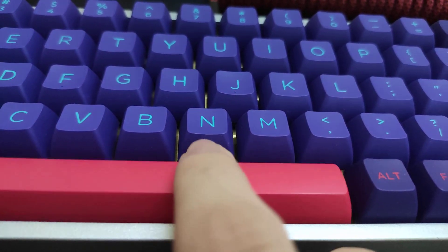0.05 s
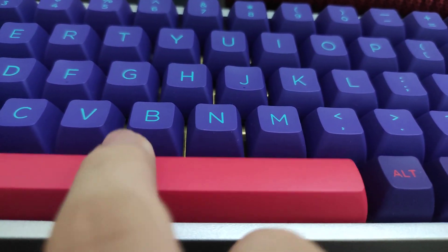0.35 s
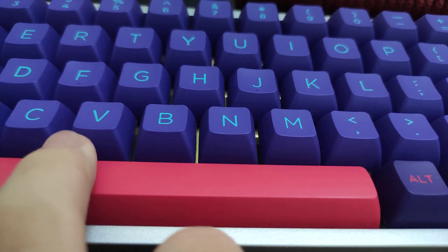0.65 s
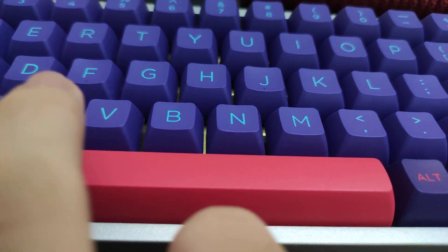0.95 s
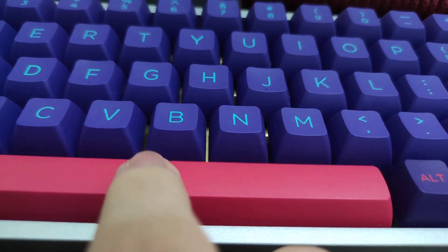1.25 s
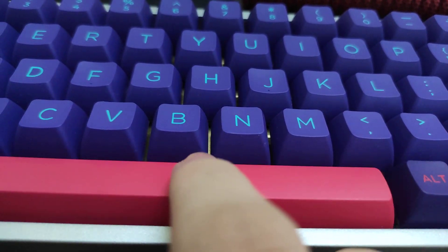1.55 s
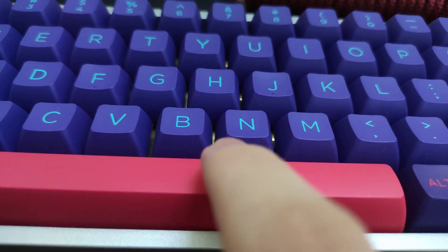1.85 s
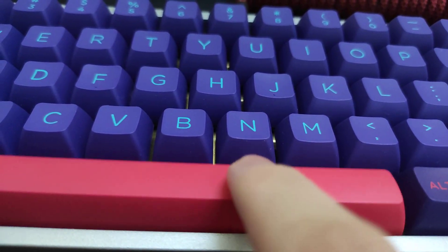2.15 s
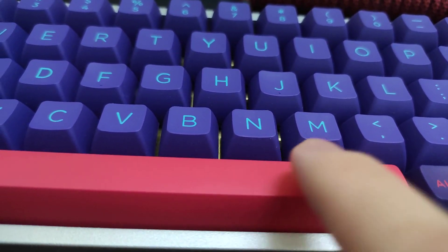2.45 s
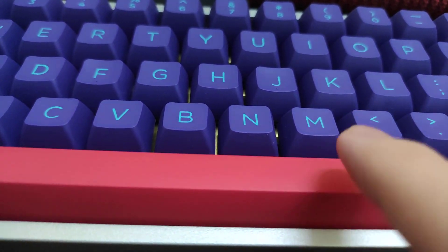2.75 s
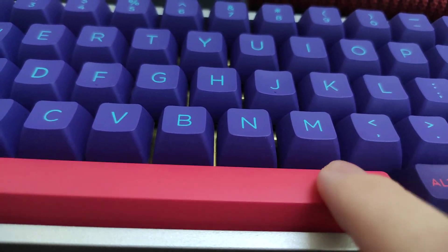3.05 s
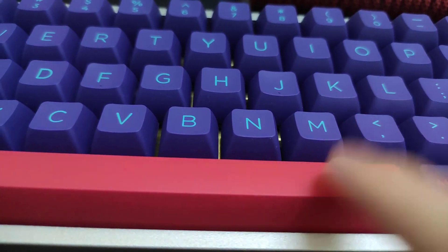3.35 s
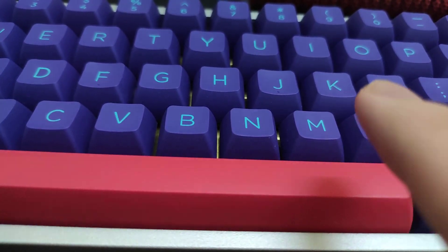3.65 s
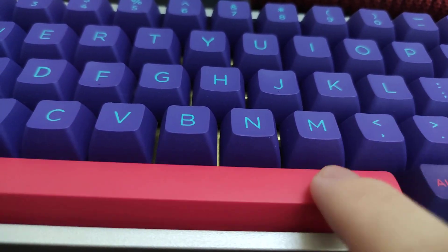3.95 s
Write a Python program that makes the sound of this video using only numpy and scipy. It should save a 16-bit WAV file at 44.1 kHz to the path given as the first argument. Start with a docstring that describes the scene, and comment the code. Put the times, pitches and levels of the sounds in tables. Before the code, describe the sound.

Sharp plastic clacks come from a mechanical keyboard spacebar as a finger presses and releases it, pausing briefly, then tapping on quickly, hardest near the end. The microphone is close, with a short room echo and faint hush.

```python
"""Tapping a keyboard spacebar

A finger works the plastic spacebar of a mechanical keyboard, close to a stereo microphone.
Each press hits the bottom with a clack, and each release snaps back against the top of the switch.
The bar rings briefly, the springs ping and the case thumps the desk.
A small room echoes each hit over a quiet hush."""
import sys
import numpy as np
from scipy import signal
from scipy.fft import rfft, irfft
from scipy.io import wavfile

SR = 44100
rng = np.random.default_rng(int(sys.argv[2]) if len(sys.argv) > 2 else 0)


def log_audio(samples):
    """Write samples as a 16-bit WAV file to the path given in sys.argv[1]."""
    # one column per channel
    frames = np.atleast_2d(samples).T
    # limit to full scale, then quantise
    limited = np.clip(frames, -1, 1)
    pcm = np.round(limited * 32767).astype(np.int16)
    wavfile.write(sys.argv[1], SR, pcm)


N = 176400
HIT_TIME = np.arange(round(.07 * SR)) / SR  # seconds since a hit
TAIL_TIME = np.arange(SR // 2) / SR  # the same, for longer sounds


def amp(db):
    """Turns decibels into a number to multiply a sound by."""
    return 10 ** (np.asarray(db) / 20)


def fade(t, fade_s):
    """Dies away by 60 dB every fade_s seconds."""
    return amp(-60 * t / fade_s)


def unit(x):
    """Gives a hit the energy of ten milliseconds at full level."""
    return x / np.sqrt(np.mean(np.sum(x ** 2, -1)) / (SR / 100) + 1e-20)


def read(points, hz):
    """Looks up a value between the pitches of a table."""
    pitches, values = np.transpose(points)
    return np.interp(np.log(hz + 1), np.log(pitches + 1), values)


def add(mix, start_s, sound):
    """Mixes a sound in at start_s."""
    part = mix[:, max(round(start_s * SR), 0):][:, :sound.shape[1]]
    part += sound[:, :part.shape[1]]


def colour(x, tone, size=4096):
    """Turns each pitch up or down as a table says, without making the sound start early."""
    log_gain = np.log(amp(read(tone, abs(np.fft.fftfreq(size, 1 / SR)))))
    taps = np.fft.ifft(np.exp(np.conj(signal.hilbert(log_gain)))).real[:size // 2]
    return signal.fftconvolve(x, taps[None], axes=1)[:, :x.shape[1]]


# The tone of the background noise. Columns: pitch_hz, level_db
HUSH_TONE = [(15, -40), (25, -8), (44, -9), (97, -12), (677, -29), (1040, -35.5), (3160, -34.5),
             (4370, -40), (13600, -54.5), (16000, -75)]
def hush(level_db=-60.5, alike_below_hz=445):
    """Quiet room noise, nearly the same left and right in the bass."""
    hz = np.fft.rfftfreq(N, 1 / SR)
    left, other = rfft(rng.standard_normal((2, N)))
    alike = .9 / (1 + (hz / alike_below_hz) ** 2)
    right = alike * left + np.sqrt(1 - alike ** 2) * other
    noise = irfft(np.array([left, right]) * amp(read(HUSH_TONE, hz)), N)
    return amp(level_db) * noise / noise.std()


def wall_echo(t, arrives_s=.029, width_s=.005):
    """A fading sound swells briefly when it bounces back from the wall."""
    return 1 + .7 * np.exp(-.5 * ((t - arrives_s) / width_s) ** 2)


# The tone of the room's echoes. Columns: pitch_hz, level_db
ECHO_TONE = [(60, -11.5), (280, 0), (520, 3.5), (800, -8.5), (1500, -12.5), (3000, -11), (4200, -10.5),
             (9000, -10.5), (15000, -20)]
# How long the echoes last. Columns: pitch_hz, fade_s
ECHO_FADES = [(100, 0.65), (500, 0.3), (2000, 0.42), (5500, 0.35), (9000, 0.34), (15000, 0.73)]
def room(x, gain_db=-2, rise_s=.011):
    """Echoes blur into a tail that builds quickly, then fades at its own speed for each pitch."""
    out, clock = 0, np.arange(N) / SR
    for k in range(3):
        hz, frame_s, noise = signal.stft(rng.standard_normal((2, SR)), SR, nperseg=256)
        tail = signal.istft(noise * fade(frame_s, read(ECHO_FADES, hz)[:, None]), SR, nperseg=256)[1]
        t = np.arange(tail.shape[1]) / SR
        tail *= (1 - np.exp(-(t / rise_s) ** 2)) * np.sqrt(wall_echo(t))
        tail = colour(tail / np.linalg.norm(tail[0]), ECHO_TONE)
        # Three tails take turns, so each hit meets different echoes.
        share = np.sqrt(2 / 3) * np.cos(2 * np.pi * (1.7 * clock + k / 3))
        out = out + signal.fftconvolve(x * share, tail, axes=1)[:, :N]
    return amp(gain_db) * out


# How the two sides hear the keyboard. Columns: pitch_hz, left_minus_right_db, left_lead_radians
MIC_SIDES = [(80, 2, 0), (190, -5, 0), (450, -4, -.1), (760, -1, -.4), (1120, -2, -1.2), (1600, -1.5, -1.9),
             (2050, -4, -6.3), (2700, -1, -7.8), (3900, 1, -12.3), (5500, 4, -14), (8000, 3, -17),
             (14000, -2, -19)]
def microphone(x):
    """Each pitch reaches the left and right sides with a different level and timing."""
    hz, table = np.fft.rfftfreq(N, 1 / SR), np.array(MIC_SIDES)
    side_db = read(table[:, :2], hz)
    lead = np.interp(hz, table[:, 0], table[:, 2])
    gains = amp([side_db / 2, -side_db / 2])
    gains /= np.sqrt(np.mean(gains ** 2, 0))
    return irfft(rfft(x) * gains * np.exp(1j * np.array([lead, 0 * lead])), N)


# The low notes of the desk and room. Columns: pitch_hz, level_db, fade_s
BOOM_NOTES = [(78.9, -8.5, 0.2), (130.9, -17.5, 0.47), (193.5, -27, 0.68), (243.5, -13, 0.3),
              (291.6, -11, .38), (335, -10.5, 0.29), (430.5, -21.5, 0.4)]
def desk_boom(gain_db=7, delay_s=.00554, rise_s=.009):
    """Low notes of the desk and room swell after a thump and throb against each other."""
    out, t = 0, TAIL_TIME
    for hz, db, fade_s in BOOM_NOTES:
        phase = 2 * np.pi * hz * (t - delay_s) + .2 * rng.standard_normal((2, 1))
        out = out + amp(db) * fade(t, fade_s) * np.cos(phase)
    return amp(gain_db) * out * (1 - np.exp(-(t / rise_s) ** 2)) * wall_echo(t)


def case_thump(swing_hz=170, delay_s=.003973, width_s=.00077):
    """The case pushes the desk once and springs back."""
    t = HIT_TIME - delay_s
    return unit(np.sin(2 * np.pi * swing_hz * t) * np.exp(-.5 * (t / width_s) ** 2))


def spring_pings(centre_hz=2950, gain_db=-36):
    """The springs give twelve faint pings, close together in pitch."""
    hz = centre_hz * (1 + .09 * rng.uniform(-1, 1, size=(12, 1, 1)))
    pings = np.sin(2 * np.pi * (hz * TAIL_TIME + rng.random(size=(12, 2, 1))))
    return amp(gain_db) * fade(TAIL_TIME, fade_s=.38) * pings.mean(0)


# The tone of hard plastic being hit. Columns: pitch_hz, level_db
CRACK_TONE = [(100, -1), (1200, -8), (2100, 2.5), (3300, 0), (4500, -2.5), (5600, 0.5), (6700, -6),
              (7600, -10.5), (9500, -23), (14000, -34), (16000, -61.5)]
def crack(treble_db=0):
    """A hard contact: a snap, then so many high notes at once that they sound like noise."""
    shape = fade(HIT_TIME, fade_s=.021) + amp(-2) * fade(HIT_TIME, fade_s=.0012)
    noise = rng.choice([-1, 1], (3, len(HIT_TIME)))  # shared, left, right
    burst = colour(shape * (noise[0] + noise[1:]), CRACK_TONE)
    return unit(colour(burst, [(5200, 0), (7400, treble_db)]))


def ring(notes, pitch_ratio=1, attack_s=.0002):
    """The bar's own notes ring and fade, a little differently wherever the finger lands."""
    out = 0
    for hz, db, fade_s in notes:
        detune, louder, shift = rng.standard_normal(3)
        phase = 2 * np.pi * hz * pitch_ratio * (1 + .018 * detune) * HIT_TIME + .6 * shift
        note = amp(db + 1.8 * louder) * fade(HIT_TIME, fade_s) * np.sin(phase)
        out = note - out  # neighbouring notes swing opposite ways
    return unit(out * (1 - np.exp(-HIT_TIME / attack_s)))[None]


# The main notes of the bar when it is down. Columns: pitch_hz, level_db, fade_s
DOWN_NOTES = [(751, -21.5, 0.048), (915, -23, 0.042), (1358, -9, 0.039), (1623, 0.5, 0.022),
              (1915, 0.5, 0.017), (2114, -10.5, .02), (2797, -17, 0.033), (5355, -14, 0.011),
              (6400, -15, 0.015)]
def down_ring(pitch_hz=None):
    """The pressed bar rings. Giving pitch_hz moves all its notes so the strongest sits there."""
    strongest_hz = max(DOWN_NOTES, key=lambda note: note[1])[0]
    return ring(DOWN_NOTES, pitch_hz / strongest_hz if pitch_hz else 1)


# Ticks of the wire under the bar. Columns: start_s, level_db
WIRE_TICKS = [(2.544, -63), (3.107, -50), (3.263, -62.5)]
def wire_ticks(hits):
    """The wire that keeps the bar level gives tiny, bright ticks."""
    for start_s, level_db in WIRE_TICKS:
        add(hits, start_s, amp(level_db) * crack(treble_db=17))


# Light landings of the finger. Columns: start_s, level_db, pitch_hz
FINGER_TOUCHES = [(.088, -48, 1600), (0.157, -54, 1700), (.304, -54.5, 1600), (.436, -58.5, 970),
                  (.699, -51, 970), (.843, -44.5, 1070), (2.729, -41, 1470), (3.449, -40.5, 1420),
                  (3.793, -43.5, 1500)]
def finger_touches(hits):
    """The finger lands on the loose bar and takes up its slack with a soft click."""
    for start_s, level_db, pitch_hz in FINGER_TOUCHES:
        add(hits, start_s, amp(level_db) * (down_ring(pitch_hz) + .37 * crack()))


def lead_in_rustle(swell_s):
    """A faint, ringing rustle swells just before each press's clack."""
    count = round(swell_s * SR)
    rising_noise = rng.standard_normal(count) * np.linspace(.3, 1, count)
    return unit(signal.fftconvolve(down_ring() + .5 * crack(), rising_noise[None], axes=1))


# Second hits just after a press. Columns: start_s, ring_db, crack_db
LATE_LANDINGS = [(2.7448, -49, -38), (3.4636, -25.5, -33.5)]
def late_landings(hits):
    """The far end of the bar lands late after a hard press."""
    for start_s, ring_db, crack_db in LATE_LANDINGS:
        add(hits, start_s, amp(ring_db) * down_ring() + amp(crack_db) * crack())


def clack(hits, tails, stroke, main_ring, high_ring, direction):
    """The bar hits a stop, shaking the case, desk and springs. Direction is 1 for down, -1 for up."""
    start_s, ring_db, high_ring_db, crack_db, treble_db = stroke
    bar = amp(ring_db + 1) * main_ring + amp(high_ring_db + 2.5) * high_ring
    shove = direction * amp(-22.5 + .69 * ring_db)  # the thump grows more slowly than the ring
    add(hits, start_s, bar + amp(crack_db + 3) * crack(treble_db) + shove * case_thump())
    add(tails, start_s, shove * desk_boom() + amp(high_ring_db) * spring_pings())


# The main and high notes of the bar when it is up. Columns: pitch_hz, level_db, fade_s
UP_NOTES = [(737, -17, 0.049), (1102, -8, 0.032), (1352, -10, 0.041), (1643, 4.5, .019), (1900, 9, 0.011),
            (2384, 0.5, .016), (5430, -16, 0.015)]
UP_HIGH_NOTES = [(2530, -2.5, 0.0077), (2910, 0.5, 0.0094), (3023, 6, 0.019)]
# Each time the finger lets go. Columns: start_s, ring_db, high_ring_db, crack_db, treble_db
BAR_RELEASES = [(0.3733, -34.5, -44, -38, 0), (0.5172, -28.5, -30, -33, 2.5),
                (0.6552, -30, -35.5, -35, 3.5), (0.7782, -29.5, -28, -32.5, 1),
                (0.9237, -28.5, -29, -34.5, 0), (1.3721, -31.5, -38, -41, -2),
                (1.6817, -33, -57, -40.5, 1.5), (1.9231, -34, -60, -42, 2), (2.0669, -33, -44, -40, 4.5),
                (2.204, -34, -46, -42, 3), (2.4439, -33, -50, -40, 2.5), (2.8107, -27.5, -27.5, -37.5, 9),
                (2.9578, -28.5, -30, -36.5, 6.5), (3.1943, -31, -37, -39, 3), (3.5355, -36, -45, -52, -10),
                (3.8646, -32, -40, -38, 1.5)]
def releases(hits, tails):
    """The bar snaps back up against the top of the switch."""
    for stroke in BAR_RELEASES:
        clack(hits, tails, stroke, ring(UP_NOTES), ring(UP_HIGH_NOTES), direction=-1)


# The high notes of the bar when it is down. Columns: pitch_hz, level_db, fade_s
DOWN_HIGH_NOTES = [(2277, -4.5, 0.025), (2982, -3, 0.046)]
# Each time the finger pushes down. Columns: start_s, ring_db, high_ring_db, crack_db, treble_db
BAR_PRESSES = [(0.0142, -32.5, -45.5, -39, -4.5), (0.2229, -40, -50.5, -47, 1.5),
               (0.5875, -30.5, -50, -36.5, 0), (0.7196, -31.5, -58, -36.5, -1.5),
               (0.8538, -25.5, -41.5, -31.5, 3.5), (1.2656, -27, -61, -32.5, 0),
               (1.6055, -34, -45, -42, -1), (1.8509, -33.5, -48, -39.5, -3.5),
               (1.9967, -30.5, -63, -35.5, -0.5), (2.1309, -29.5, -61, -32.5, 1.5),
               (2.2628, -34, -48, -40, 1.5), (2.3759, -34.5, -48, -40.5, 3), (2.7399, -27.5, -44, -31.5, 6),
               (2.8935, -37.5, -56, -47, 0), (3.024, -33, -51, -39, -0.5), (3.088, -40, -52.5, -52, 3.5),
               (3.1312, -37.5, -46, -46.5, -3), (3.4589, -22.5, -30.5, -24.5, 7),
               (3.805, -24.5, -49, -29.5, 3)]
def presses(hits, tails, lead_in_s=.011):
    """A faint rustle leads in, then the bar hits the bottom."""
    for stroke in BAR_PRESSES:
        start_s, ring_db = stroke[:2]
        add(hits, start_s - lead_in_s, amp(ring_db - 22) * lead_in_rustle(lead_in_s))
        clack(hits, tails, stroke, down_ring(), ring(DOWN_HIGH_NOTES), direction=1)


def scene():
    """Mixes the spacebar with the room. Only the short hits echo, not the booms and pings."""
    hits, tails = np.zeros((2, N)), np.zeros((2, N))
    presses(hits, tails)
    releases(hits, tails)
    late_landings(hits)
    finger_touches(hits)
    wire_ticks(hits)
    return microphone(hits + tails) + room(hits) + hush()


def record(dry):
    """Cuts away the very highest treble, above 16500 Hz."""
    low_pass = signal.firwin(511, 16500, window=("kaiser", 9), fs=SR)
    return signal.oaconvolve(dry, low_pass[None], "same")


dry = scene()
out = record(dry)
log_audio(out)
```